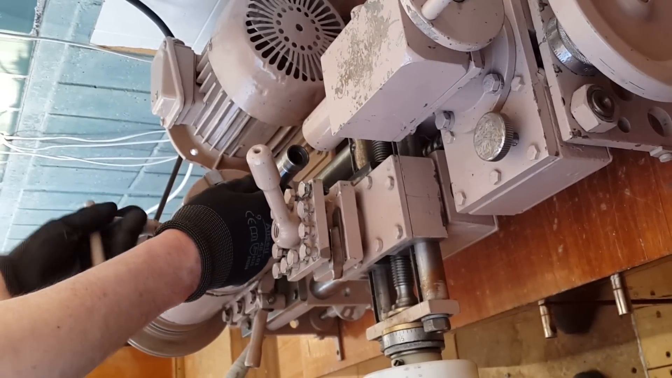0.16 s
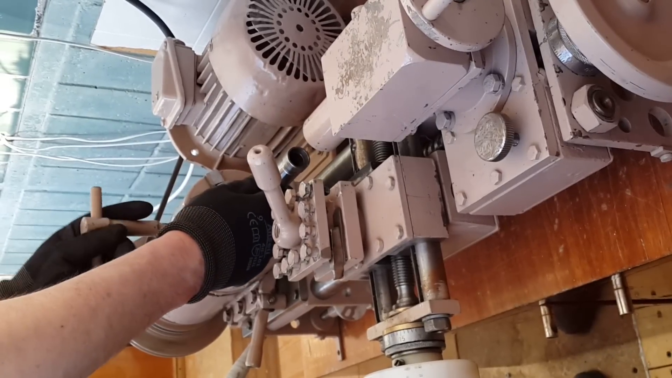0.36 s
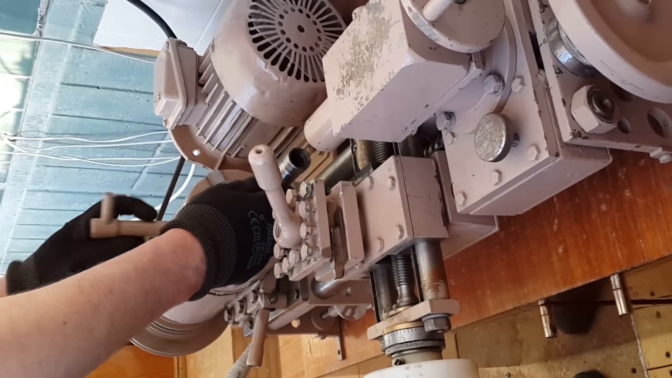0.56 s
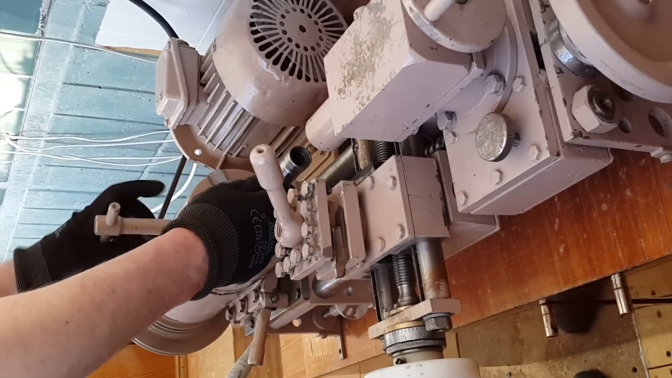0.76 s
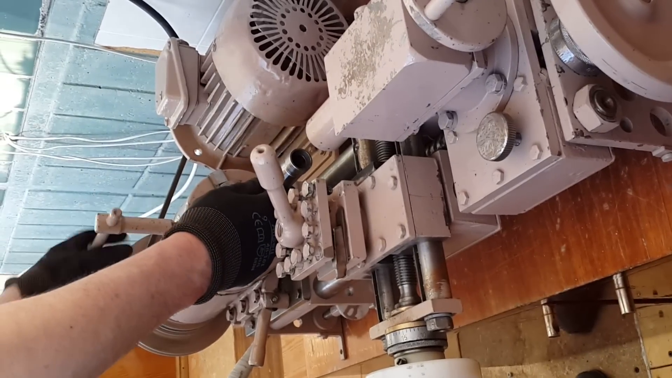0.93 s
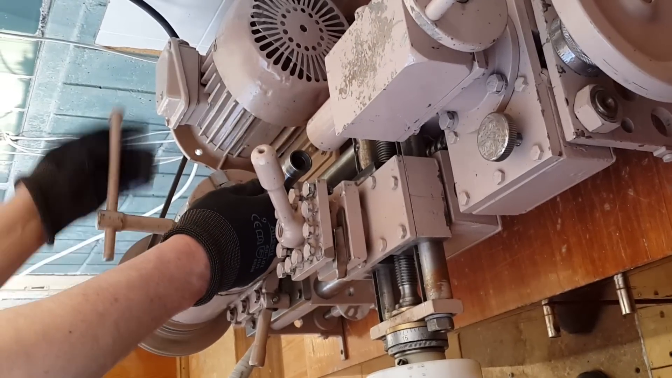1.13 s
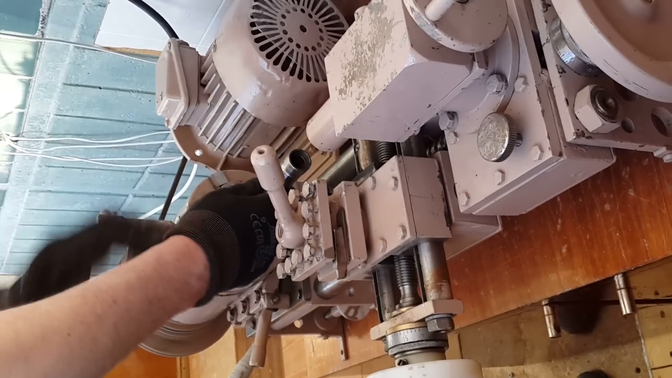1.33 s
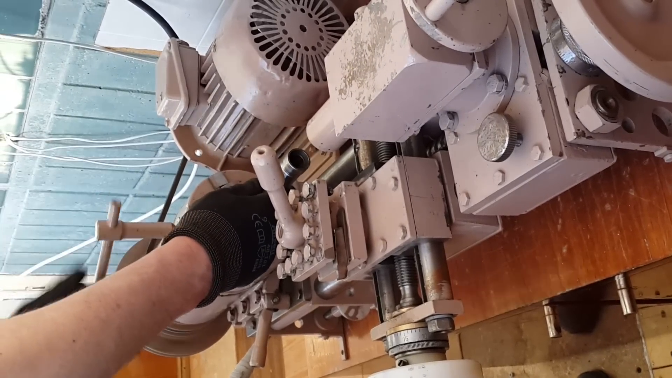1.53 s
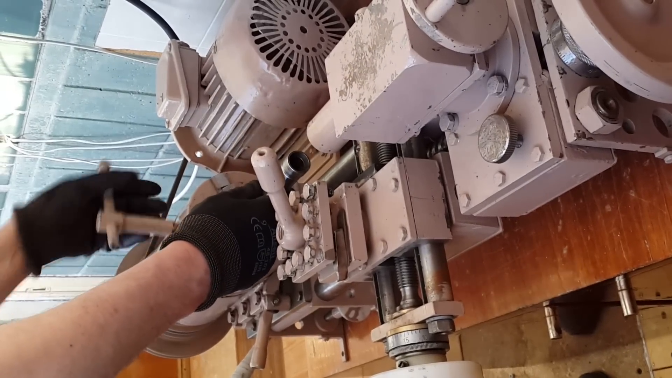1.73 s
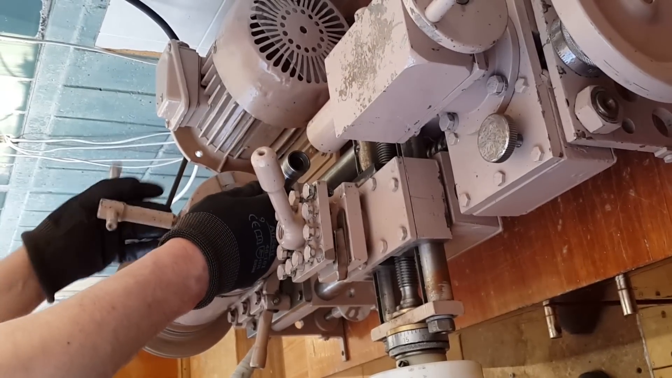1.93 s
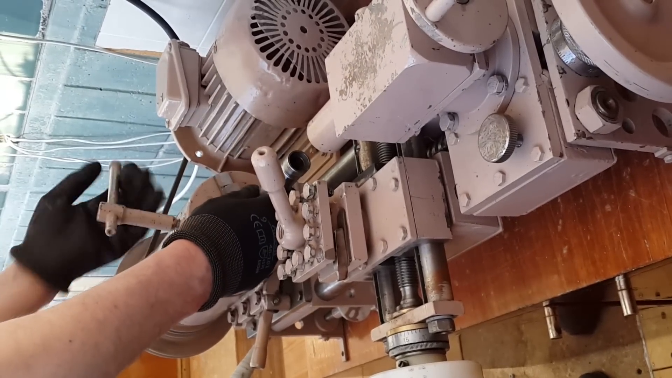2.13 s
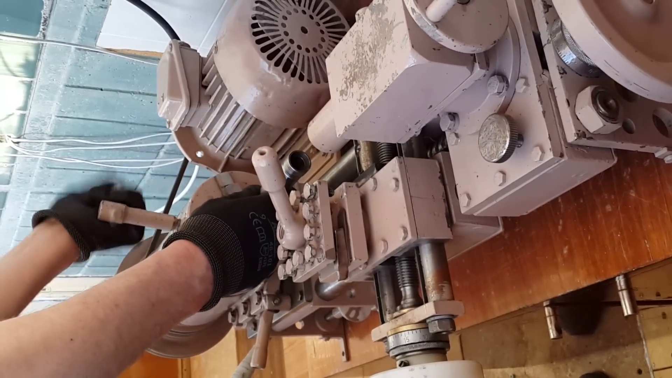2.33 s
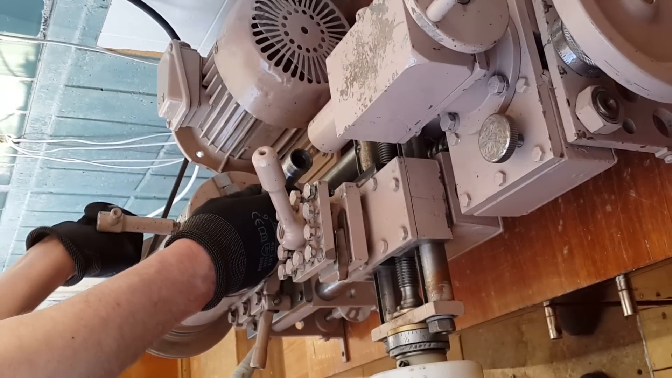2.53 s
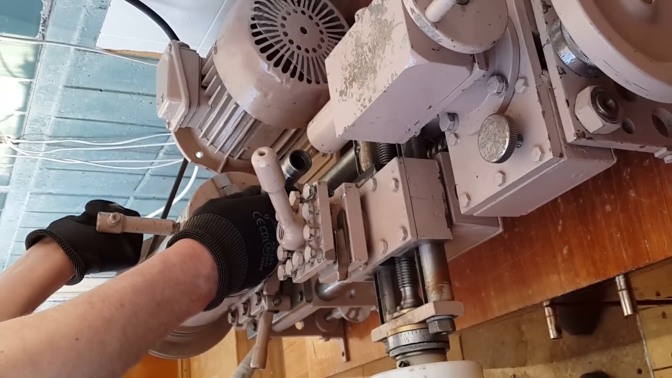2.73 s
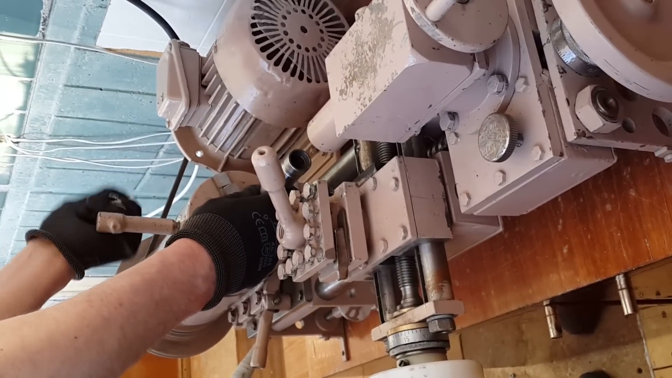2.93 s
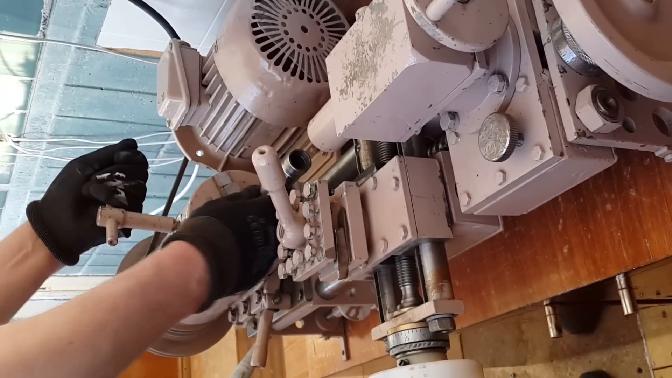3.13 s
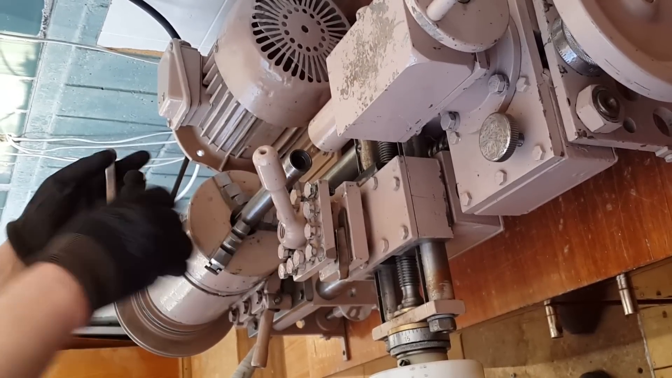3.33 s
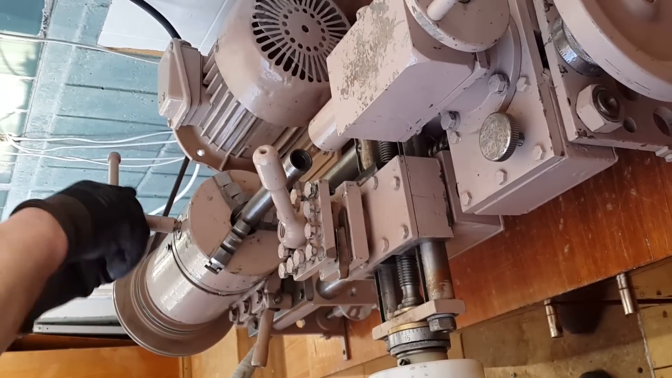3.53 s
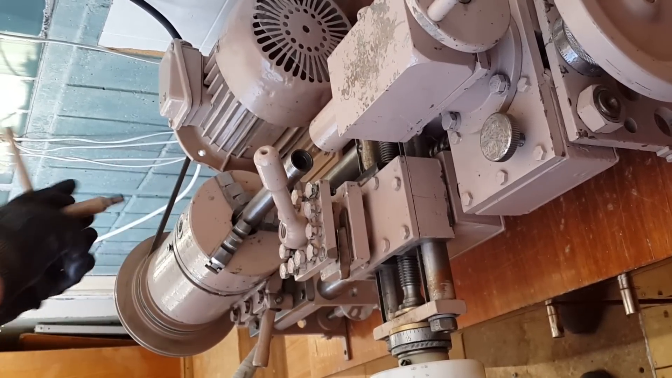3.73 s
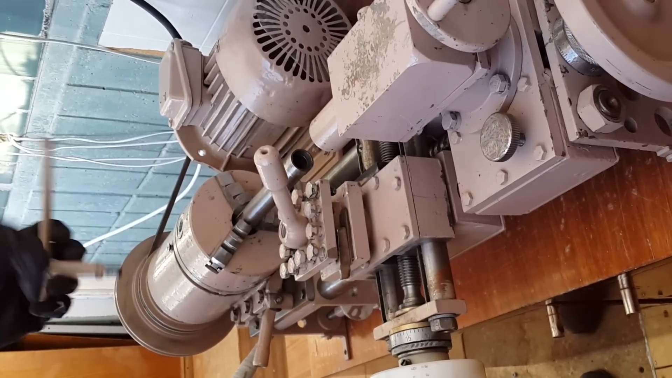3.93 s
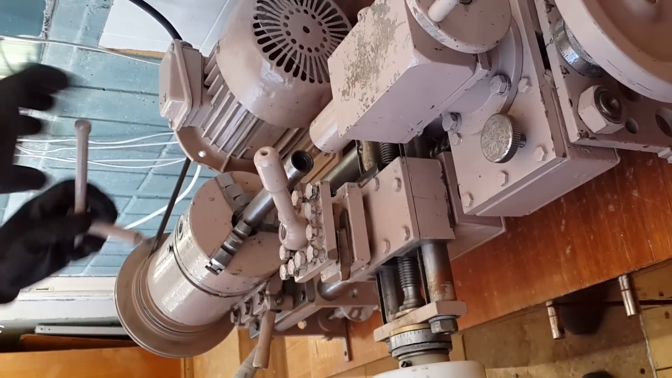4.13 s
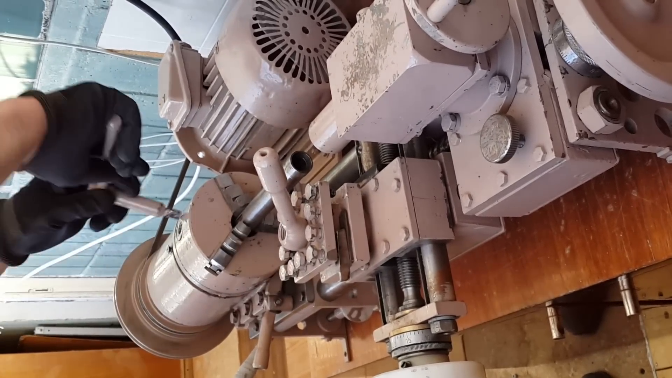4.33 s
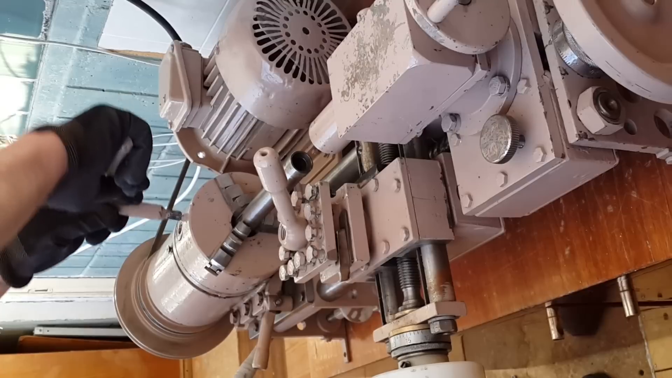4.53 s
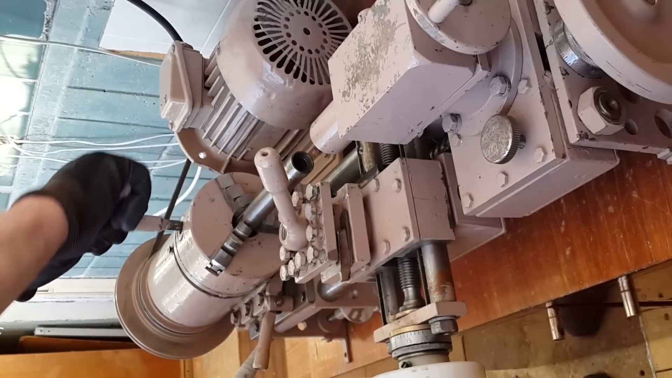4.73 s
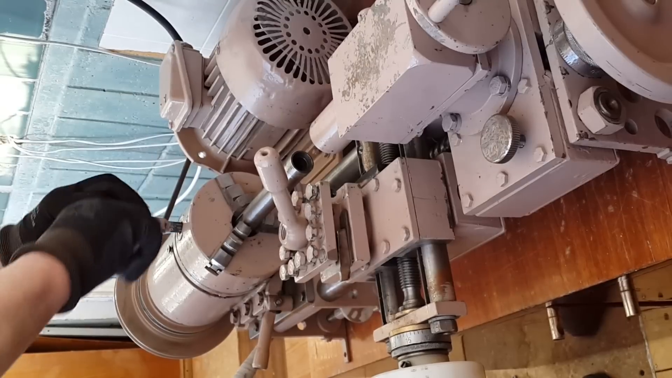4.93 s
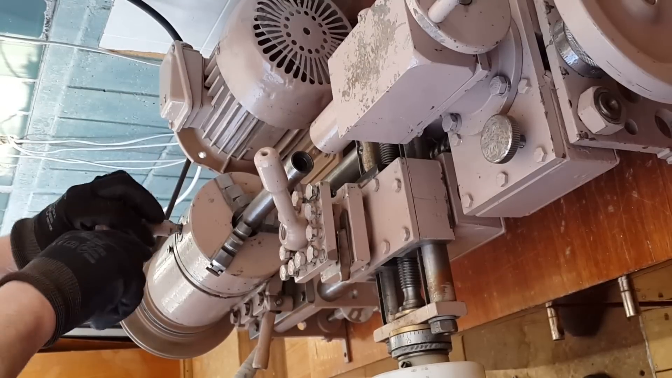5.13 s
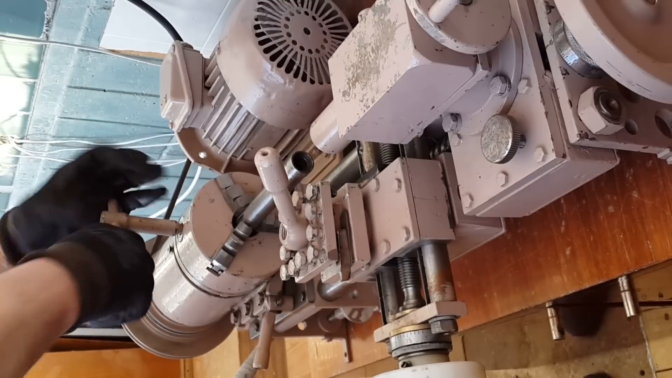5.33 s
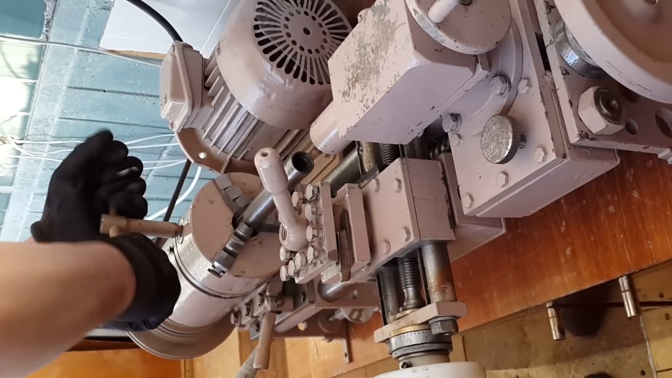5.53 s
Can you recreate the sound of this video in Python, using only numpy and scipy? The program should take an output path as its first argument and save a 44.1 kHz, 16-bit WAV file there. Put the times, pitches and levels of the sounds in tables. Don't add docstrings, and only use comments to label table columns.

```python
import sys
import numpy as np
from scipy import signal
from scipy.fft import rfft, irfft
from scipy.io import wavfile
from scipy.ndimage import uniform_filter1d, minimum_filter1d, map_coordinates

SR = 44100
rng = np.random.default_rng(int(sys.argv[2]) if len(sys.argv) > 2 else 0)


def output_pcm(signal):
    pcm = np.clip(np.atleast_2d(signal).T, -1, 1) * 32767
    wavfile.write(sys.argv[1], SR, np.round(pcm).astype(np.int16))


def natural_amplitude(level_db):
    exponent = np.asarray(level_db, float) / 20
    return 10 ** exponent


N = 250047
TIME = np.arange(N) / SR

# f/Hz, level/dB per Hz
SHOP_AIR = [(20, -16), (60, -22), (200, -12.5), (1000, -17.5), (4000, -20.5), (9000, -18), (13000, -24),
            (15500, -13)]
SHOP_AIR_DB = -1
# t/s, level/dB
RUSTLE = [(.6, -54.5), (.97, -60), (1.9, -50), (2.3, -54), (2.95, -62.5), (3.3, -53), (3.53, -64.5),
          (4.6, -65), (5.67, -48.5)]
# f/Hz, level/dB rms
WHINE = [(200, -72), (315, -72), (9365, -88)]
ROOM_T60_S, ROOM_DB, ROOM_LOW_HZ, ROOM_TOP_HZ = 0.145, -1.5, 640, 13300

# f/Hz, left minus right level/dB
PORTS = [(150, -2), (380, -2.5), (700, 0.5), (1500, -5), (4400, 4), (8120, -1.5), (15000, -5.5)]
# t/s, lag/samples
LEFT_LAG = [(0, 11), (1.7, 5.5), (2.0, -7), (3.3, -4), (3.6, 13), (4.3, 0), (4.45, 21), (5.67, 18.5)]
RUMBLE_DB = -81
DIP_RISE_DB, DIP_S, DIP_HZ = 12.5, 0.045, 11600

# f/Hz, level/dB, t60/s
STAND = [(84.5, -13.5, 0.24), (107.8, -4.5, 0.16), (121, 0.5, 0.054), (149, 1.5, 0.1), (199, -2.5, 0.13),
         (216.6, -6.5, 0.16), (258, 1, 0.054), (312, -3.5, 0.088), (375.5, -2, 0.063), (438.4, -9.5, 0.18),
         (484, -8, 0.1)]
CASTING = [(525, -0.5, 0.092), (626, -10.5, 0.14), (696, -17.5, 0.22), (849.7, -1, 0.063),
           (933, -1.5, 0.041), (995, -5, 0.11), (1062, -1, 0.047), (1281.6, -4.5, 0.039),
           (1520, -19, 0.0091), (1600, -5.5, 0.039), (1788, 1.5, 0.011)]
CHUCK = [(1630, 2, .035), (1750, 2, .035), (2090, -6, .02), (2330, -4, .02), (2580, -3, .025),
         (2910, -2, .025), (3400, -5, .025), (3800, -5, .025), (4200, -2, .03), (4560, -3, .025),
         (5170, -2, .025), (5980, -5, .02), (6930, -3, .03), (8500, -5, .02)]
# f/Hz, level/dB, t60/s
HANDLE = [
    [(4264, -2, .06), (4390, 1, .065)],
    [(1728, -4, .07)],
    [(8170, 2, .06)],
    [(12440, -7, .14), (12700, -2, .14)],
]

# t/s, peak level/dB, strongest f/Hz
THUMPS = [(0.025, -33, 423), (0.114, -31.5, 414), (0.36, -41, 287), (0.403, -35.5, 210),
          (0.479, -36, 257), (0.562, -37, 161), (0.607, -20, 255), (0.628, -22, 188),
          (0.702, -19, 260), (0.73, -26.5, 199), (0.858, -38, 312), (1.004, -45.5, 312),
          (1.349, -25, 240), (1.401, -24.5, 163), (1.543, -29, 280), (1.846, -21, 149),
          (1.885, -42, 163), (2.003, -41, 275), (2.04, -23, 148), (2.057, -30.5, 460),
          (2.072, -31, 187), (2.1, -35, 148), (2.222, -38, 246), (2.268, -44.5, 200),
          (2.385, -20.5, 160), (2.44, -22.5, 138), (2.488, -21.5, 188), (2.644, -29.5, 237),
                (2.68, -32, 160), (3.08, -31.5, 207), (3.109, -21, 144), (3.284, -39, 146),
                (3.544, -41, 230), (3.632, -38.5, 175), (3.68, -33, 152), (3.724, -32.5, 138),
                (4.455, -23.5, 230), (4.489, -38, 177), (4.665, -30.5, 250), (4.718, -32, 211),
                (4.859, -28, 241), (4.883, -26.5, 265), (4.946, -25.5, 126), (4.969, -16, 260),
                (5.004, -33, 151), (5.143, -27, 160), (5.182, -18.5, 158), (5.224, -26, 185),
                (5.361, -27.5, 164), (5.487, -27, 136)]
# t/s, peak level/dB, strongest f/Hz
CHUCK_BLOWS = [(0.0293, -35, 5080), (0.115, -27, 3300), (0.306, -40, 2660), (0.3391, -36, 3440),
               (0.4224, -49, 1630), (0.478, -49, 1640), (0.6019, -25, 5640), (0.7035, -28, 1640),
               (0.768, -34, 1740), (0.8574, -34, 1690), (1.0804, -41, 1740), (1.1174, -34, 1750),
               (1.131, -30, 1590), (1.1554, -30, 1640), (1.173, -19, 1620), (1.264, -27, 1760),
               (1.287, -34, 1720), (1.3574, -20, 5080), (1.3992, -19, 1740), (1.4548, -9.5, 1630),
               (1.5084, -17.5, 2410), (1.5408, -15, 5000), (1.5695, -8.5, 2920), (1.6757, -22.5, 1760),
               (1.7315, -36, 1600), (1.7516, -19, 1610), (1.8064, -18, 1610), (2.0057, -35, 1850),
               (2.0534, -28, 5330), (2.2196, -43, 1940), (2.341, -40, 1820), (2.383, -22, 2220),
               (2.4379, -20, 6340), (2.4794, -19, 4360), (2.5691, -28, 1750), (2.6765, -23, 1860),
               (3.0164, -38, 1600), (3.083, -34, 2390), (3.0997, -31.5, 1670), (3.678, -36, 7160),
               (3.7259, -29.5, 3990), (4.4541, -15, 4370), (4.581, -52, 1730), (4.667, -40, 2640),
               (4.6887, -52, 3770), (4.8594, -28, 3970), (4.8824, -16, 6990), (4.9428, -22, 1740),
               (4.9681, -4.5, 5100), (5.1437, -27, 1630), (5.327, -35, 1820), (5.3705, -28.5, 2140),
               (5.429, -41, 1520), (5.4784, -29, 3360), (5.5965, -34, 1810)]

# peak t/s, rise t/s and fall t/s over 20 dB, level/dB, brightest f/Hz
GLOVES = [(3.17, 0.044, 0.039, -53.5, 2660), (3.248, 0.03, 0.23, -60, 6450),
          (3.39, 0.078, 0.044, -56.5, 3940), (3.674, 0.079, 0.18, -82, 6800), (3.75, 1, 0.14, -64, 4000),
          (3.826, 0.16, 0.068, -52.5, 4400), (4.034, 0.16, 0.012, -42, 6030),
          (4.07, 0.035, 0.11, -59, 7100), (4.31, 0.0062, 0.11, -61.5, 5840),
          (5.477, 0.027, 0.13, -55, 3440), (5.528, 0.06, 0.027, -30, 3520), (5.66, 0.52, 0.65, -52.5, 3840)]
# t/s, peak level/dB, then level/dB of single, third and top order rel to the low
TINKLES = [(0.1716, -50, -1.5, -7, 6), (0.611, -63, 2, -13, -24), (2.465, -45, 3, -9, -16),
           (2.545, -56, 5, -1, -14), (2.5819, -66, 9, -18, -29), (2.638, -58, 5, -4, -24),
           (2.6707, -61, 10, -17, -28), (2.695, -72, 15, -11, -31), (2.763, -67, 10, -9, -8),
           (2.835, -65, -13, 4, -20), (3.337, -62, -18, -8, -43), (4.711, -74, -4, 8, -25)]
# peak t/s, rise t/s and fall t/s over 20 dB, level/dB
RATTLE = [(2.5, .04, .05, -84), (2.585, .04, .035, -79), (2.692, .045, .035, -76), (2.78, .06, .06, -92),
          (2.835, .04, .02, -81)]
# start t/s, end t/s
BITE = (2.49, 2.86)
GRIP_DB = 0.5
# start t/s, end t/s, f/Hz, level/dB
GROAN = (5.495, 5.61, 458, -49)
# start t/s, end t/s, from f/Hz, to f/Hz, level/dB
SQUEAKS = [(2.065, 2.125, 5250, 4900, -66), (2.135, 2.19, 4250, 3950, -62), (5.44, 5.49, 1480, 1640, -51),
           (5.45, 5.482, 2950, 3250, -60), (5.452, 5.482, 4500, 5000, -53), (5.49, 5.575, 2700, 2350, -48),
           (5.51, 5.58, 3300, 2900, -52), (5.5, 5.56, 2200, 2000, -52), (5.5, 5.56, 4200, 3700, -50),
           (5.5, 5.57, 1600, 1550, -54), (5.6, 5.7, 1800, 1700, -59)]

# peak t/s, rise t/s and fall t/s over 20 dB, effort level/dB, slip level/dB
TURNS = [(0.0, .1, 0.71, -54.5, -7), (0.135, 0.38, 0.061, -50, -8), (0.415, 0.16, 0.096, -43.5, -7.5),
         (0.633, 0.045, 0.044, -33, 1), (0.742, 0.19, 0.14, -48, 8.5), (1.94, 0.22, 0.41, -71.5, 25.5),
         (2.02, 0.037, 0.19, -45.5, -44), (2.387, 0.039, 0.33, -36, -13), (2.53, 0.17, 0.081, -56, -11),
         (2.682, 0.06, 0.027, -39.5, -14), (2.81, 0.34, 0.13, -46, -17), (3.23, 0.52, 0.072, -57, -4),
         (3.61, 0.34, 0.16, -57.5, -28), (3.91, 0.59, 0.4, -55.5, 5.5), (4.653, 0.015, 0.32, -49.5, -8.5),
         (4.87, 0.046, 0.19, -41, -16), (5.045, 0.14, 0.3, -59, 15.5), (5.16, 0.083, 0.13, -54.5, 11),
         (5.4, 0.092, 0.48, -50, -2)]
# t/s, effort level/dB, slip level/dB
SPIN = [(1.05, -63, 9), (1.076, -50.5, -4.5), (1.172, -42.5, 14.5), (1.41, -38.5, 12), (1.558, -34, 11),
        (1.62, -40.5, 9.5), (1.73, -42.5, -0.5), (1.812, -35.5, 7), (1.87, -70, 14)]
CASTING_DRAG_DB, CASTING_SLIP_SHARE, TEETH_DRAG_DB, TEETH_SLIP_SHARE = -8, 0.27, -11.5, 0.85

# t/s, peak level/dB, casting level/dB rel, top level/dB rel
KEY_IN_SOCKET = [(0.0288, -37.5, -6, -6), (0.401, -55, 13.5, -11), (0.421, -42.5, -4, -28),
                 (1.009, -53, -18, -12), (2.005, -44, -10, -7), (2.2203, -57, 4, -16),
                 (2.6394, -45.5, -5, -19), (2.7897, -41.5, -6.5, -29), (3.0989, -30, -10, -62),
                 (3.5438, -72.5, 18.5, -31), (3.6307, -87, 28, 5), (3.678, -43, -3, 6),
                 (3.7257, -37, -6, -7), (4.4528, -27, -8, -11), (4.5836, -51, -10, -6),
                 (4.6665, -48.5, 2.5, -32), (4.6887, -33.5, -11.5, -10.5), (4.8403, -49.5, 7, -5),
                 (4.8594, -28.5, -4, -6), (4.8815, -22, -11, -8), (4.9654, -15.5, -5, -1.5),
                 (5.1438, -26.5, -10, -7.5), (5.1817, -40, 8, -8), (5.3706, -42, 12, -4),
                 (5.4775, -26, -24, -8)]
# t/s, peak level/dB, casting level/dB rel, top level/dB rel
BAR_ON_JAWS = [(0.1146, -27.5, -13.5, -49), (0.305, -46.5, -5.5, -10), (0.4765, -52.5, 5, -31),
               (0.7008, -25.5, -0.5, -8), (1.4557, -24, -8, -6.5), (2.4799, -28, -12.5, -24)]
# t/s, peak level/dB, casting level/dB rel, top level/dB rel
PINION_STOPS = [(2.0532, -36, -9, -17), (2.3408, -44.5, -6, -13), (2.4378, -18, -13, -5.5),
                (4.9438, -31.5, 3, -9)]
# t/s, peak level/dB, casting level/dB rel, top level/dB rel
SCROLL_SLACK = [(0.594, -37.5, -9, -3), (0.6035, -21.5, -12.5, -2.5), (0.7694, -46, -5, -23),
                (0.857, -47.5, -2.5, -1), (1.0795, -39, -8.5, -29), (1.3576, -28.5, -9, -1.5),
                (1.4002, -25, -7, -8), (1.5745, -25.5, -34, -0.5), (1.7325, -28, -12, -27),
                (1.8145, -33, 1.5, -4.5), (2.381, -24.5, -37, -2.5), (2.5696, -26, -40, -31),
                (2.6748, -35, -7, -29), (3.0172, -39, -6, -42), (3.0834, -31.5, -8.5, -69),
                (5.596, -37, -13, -1.5)]
SOCKET_HZ, JAWS_HZ, PINION_HZ, SCROLL_HZ = 850, 1040, 1290, 1840
CONTACT_MS, CONTACT_MS_PER_DB = 2.67, 1.7
# f/Hz, level/dB per Hz
CRACK = [(300, -2), (800, 1), (2000, 7.5), (4400, 5), (7000, -1), (9000, -5.5), (12000, -3.5), (15000, 4)]
# f/Hz, level/dB per Hz
RUB = [(300, -0.5), (700, -16), (1700, 0), (3000, 0.5), (6000, -10), (9250, -7), (13000, -19), (15000, -57)]


def rms_one(x):
    return x / np.sqrt(np.mean(x ** 2) + 1e-20)


def in_time(rows):
    s, *columns = np.transpose(rows)
    return [np.interp(TIME, s, column) for column in columns]


def inside(rows):
    return np.clip(np.minimum(TIME - rows[0][0] + 0.02, rows[-1][0] + 0.02 - TIME) / 0.02, 0, 1)


def progress(start, end):
    return np.clip((TIME - start) / (end - start), 0, 1)


def butter(x, order, hz, kind="low"):
    return signal.sosfilt(signal.butter(order, hz, kind, fs=SR, output="sos"), x)


def log_curve(hz, points):
    point_hz, db = np.transpose(points)
    return np.interp(np.log(hz), np.log(point_hz), db)


def colour(x, points):
    hz = np.maximum(np.linspace(0, SR / 2, 1025), 1)
    cepstrum = irfft(np.log(natural_amplitude(log_curve(hz, points))))
    cepstrum[1:1024] *= 2
    cepstrum[1025:] = 0
    taps = irfft(np.exp(rfft(cepstrum)))
    return signal.oaconvolve(x, taps / np.sqrt(np.sum(taps ** 2)))[:N]


def wobble(rate, spread_db):
    r = np.exp(-80 * np.pi * rate / SR)
    slow = signal.lfilter([1], [1, -2 * r, r * r], rng.standard_normal(N // 40 + 2002))[2000:]
    return np.interp(np.arange(N) / 40, np.arange(len(slow)), natural_amplitude(spread_db * rms_one(slow)))


def swells(s, rise_s, fall_s, db):
    late = TIME[::32] - s[:, None]
    rise = -late / np.maximum(rise_s, 0.005)[:, None]
    fall = late / np.maximum(fall_s, 0.005)[:, None]
    loss_db = 20 * np.where(late < 0, rise, fall)
    return np.interp(TIME, TIME[::32], natural_amplitude(db[:, None] - loss_db).sum(axis=0))


def grit(per_s, uneven_db):
    sizes = natural_amplitude(uneven_db * np.minimum(rng.exponential(1, N), 5)) * rng.choice([-1, 1], N)
    return rms_one(sizes * (rng.random(N) < per_s / SR) * wobble(40, 1.5))


def tap(count, width_ms, tail_db, tail_ms):
    ms = np.arange(4096) * 1000 / SR
    push = np.sin(np.pi * np.clip(ms / width_ms, 0, 1)) ** 2
    shudder = rng.standard_normal((count, 4096)) * np.exp(-ms / tail_ms)
    return push / push.sum() + natural_amplitude(tail_db) * shudder / np.sqrt(np.sum(shudder ** 2, axis=1, keepdims=True))


def chatter(lengths_ms, tail_db, tail_ms):
    ms = np.arange(4096) * 1000 / SR
    shape = np.exp(-ms / np.maximum(lengths_ms, 0.3)[:, None]) + natural_amplitude(tail_db) * np.exp(-ms / tail_ms)
    rough = rng.standard_normal(shape.shape) * natural_amplitude(5 * rng.standard_normal(shape.shape))
    bursts = rough * shape * np.minimum(ms / 0.9, 1)
    return bursts / np.sqrt(np.sum(bursts ** 2, axis=1, keepdims=True))


def contacts(times, gains, bursts):
    at = np.round(times * SR).astype(int)[:, None] + np.arange(bursts.shape[1])
    return np.bincount(at.ravel(), (bursts * gains[:, None]).ravel(), N + 4096)[:N]


def ring(force, hz, t60):
    r, w = natural_amplitude(-60 / (t60 * SR)), 2 * np.pi * hz / SR
    return signal.lfilter([0, np.sin(w)], [1, -2 * r * np.cos(w), r * r], force + 1e-18)


def body(modes, blows, bursts, spread_db, friction, focus_db):
    times, blow_db, blow_hz = blows
    luck_db = rng.normal(0, 1, (len(times), len(modes))) * spread_db
    energy = sum(natural_amplitude(2 * db) * t60 * SR / (4 * np.log(1000)) for hz, db, t60 in modes)
    out = 0
    for k, (hz, db, t60) in enumerate(modes):
        reach_db = blow_db + luck_db[:, k] - focus_db * np.abs(np.log2(hz / blow_hz))
        force = contacts(times, natural_amplitude(reach_db), bursts)
        force = force + friction * wobble(21.5, 1.45) / np.sqrt(energy)
        out = out + ring(force * natural_amplitude(db), hz, t60) * (-1) ** k
    return out


def drag(slip_share):
    s, rise_s, fall_s, effort_db, slip_db = np.transpose(TURNS)
    spin_db, spin_slip_db = in_time(SPIN)
    short_turns = swells(s, rise_s, fall_s, effort_db + slip_share * slip_db)
    return short_turns + natural_amplitude(spin_db + slip_share * spin_slip_db) * inside(SPIN)


def shop_air():
    hiss = np.array([colour(rng.standard_normal(N), SHOP_AIR) for _ in range(2)])
    out = hiss * natural_amplitude(SHOP_AIR_DB + in_time(RUSTLE)[0]) * wobble(6, 1.5)
    for hz, db in WHINE:
        unsteady_phase = 0.323 * wobble(4.46, 11)
        out = out + natural_amplitude(db - 4.5) * wobble(31, 1.1) * np.sin(2 * np.pi * hz * TIME + unsteady_phase)
    return out


def room(x):
    t = np.arange(SR // 2) / SR
    dying = natural_amplitude(-60 * t / ROOM_T60_S) * np.clip(t / 0.0005 - 0.5, 0, 1)
    tail = rfft(rng.standard_normal((2, len(t))) * dying)
    even = tail / np.sqrt(uniform_filter1d(np.abs(tail) ** 2, size=30, axis=1))
    tail = irfft(even, len(t)) * (t < 2 * ROOM_T60_S)
    tail = butter(tail, 2, [ROOM_LOW_HZ, ROOM_TOP_HZ], "band")
    tail = tail / np.sqrt(np.sum(tail ** 2) / 2)
    return natural_amplitude(ROOM_DB) * signal.oaconvolve(x[None], tail, axes=1)[:, :N]


def gloves():
    s, rise_s, fall_s, db, top_hz = np.transpose(GLOVES)
    fizz = [grit(15000, uneven_db=6.5) * swells(s, rise_s, fall_s, db) for _ in range(2)]
    top_octave = np.log2(np.interp(TIME, s, top_hz))
    out = 0
    for k, hz in enumerate(np.geomspace(1100, 12500, 9)):
        band = butter(fizz[k % 2] + 1e-18, 2, [hz / 1.8, hz * 0.99], "band")
        hump_db = np.maximum(-2.5 * (np.log2(hz) - top_octave) ** 2, -10)
        out = out + band * natural_amplitude(hump_db + 3 - 9 * (hz > 10000)) * wobble(15, 1.5)
    return out


def handle():
    s, peak_db, *rel_db = np.transpose(TINKLES)
    slips = tap(len(s), width_ms=0.024, tail_db=-5.5, tail_ms=12)
    buzz = swells(*np.transpose(RATTLE)) * butter(grit(900, uneven_db=3.5), 6, 9500)
    way = progress(*BITE)
    grip_db = GRIP_DB * np.where(way > 0, 1 - 2 * way, -1)
    out = 0
    for order, (share_db, modes) in enumerate(zip([0] + rel_db, HANDLE)):
        force = contacts(s, natural_amplitude(peak_db + share_db + 5), slips) + buzz
        for k, (hz, db, t60) in enumerate(modes):
            twin_db = [-grip_db, grip_db][k] if order == 0 else 0
            out = out + ring(force * natural_amplitude(db + twin_db), hz, t60)
    return out


def last_pull():
    start, end, hz, db = GROAN
    arch = np.sqrt(np.abs(np.sin(np.pi * progress(start, end))))
    out = natural_amplitude(db) * arch * np.sin(2 * np.pi * hz * TIME) * wobble(23, 2.9)
    for start, end, from_hz, to_hz, db in SQUEAKS:
        way = progress(start, end)
        phase = 2 * np.pi * np.cumsum(from_hz + (to_hz - from_hz) * way) / SR
        out = out + natural_amplitude(db) * np.sin(np.pi * way) * np.sin(phase) * wobble(160, 5)
    return out


def stand():
    s, peak_db, hz = np.transpose(THUMPS)
    slow = tap(len(s), width_ms=1.8, tail_db=0, tail_ms=40.5)
    friction = drag(0) * grit(900, uneven_db=4) * natural_amplitude(-0.5)
    return body(STAND, (s, peak_db - 5.5, hz), slow, 1.93, friction, focus_db=9.5)


def knocks():
    parts = [(KEY_IN_SOCKET, SOCKET_HZ), (BAR_ON_JAWS, JAWS_HZ),
             (PINION_STOPS, PINION_HZ), (SCROLL_SLACK, SCROLL_HZ)]
    rows = [tuple(row) + (hz,) for part, hz in parts for row in part]
    s, peak_db, casting_db, top_db, hz = np.transpose(rows)
    return s, peak_db, casting_db, hz, top_db, CONTACT_MS + CONTACT_MS_PER_DB * (peak_db + 25)


def lathe():
    s, peak_db, casting_db, casting_hz, top_db, contact_ms = knocks()
    teeth = grit(5000, uneven_db=4) * drag(TEETH_SLIP_SHARE) * natural_amplitude(TEETH_DRAG_DB)

    sharp = chatter(contact_ms, tail_db=-19, tail_ms=24)
    bands = [(6000, "low", 19), ([6000, 10000], "band", top_db + 31), (10000, "high", 2 * top_db + 12)]
    crack = sum(butter(contacts(s, natural_amplitude(peak_db + db), sharp), 3, hz, kind) for hz, kind, db in bands)
    direct = colour(crack, CRACK) + natural_amplitude(1.5) * colour(teeth, RUB)

    at, ring_db, ring_hz = np.transpose(CHUCK_BLOWS)
    short = chatter(np.full(len(at), 3), tail_db=-22, tail_ms=18)
    chuck = body(CHUCK, (at, ring_db - 14, ring_hz), short, 2, teeth * natural_amplitude(-11), focus_db=13)

    blunt = tap(len(s), width_ms=0.21, tail_db=-3, tail_ms=7.9)
    friction = drag(CASTING_SLIP_SHARE) * natural_amplitude(CASTING_DRAG_DB - 0.5) * grit(2500, uneven_db=-2.5)
    blows = s, peak_db + casting_db + 2, casting_hz
    casting = body(CASTING, blows, blunt, 0.33, friction, focus_db=11.5)
    return direct + chuck + casting


def scene():
    near = lathe() + stand() + handle() + gloves() + last_pull()
    lag, at = in_time(LEFT_LAG)[0], np.arange(N)
    direct = np.array([map_coordinates(near, [at - lag * side / 2], order=3) for side in (1, -1)])
    return direct + room(near) + shop_air()


def dip_top(x):
    level_db = 10 * np.log10(uniform_filter1d(np.mean(x ** 2, axis=0), size=441) + 1e-12)
    jump = (level_db - np.roll(level_db, 1100) > DIP_RISE_DB) * 1.0
    hold = int(DIP_S * SR)
    held = np.roll(-minimum_filter1d(-jump, size=hold), hold // 2 + 500)
    mute = uniform_filter1d(held * (1 - np.roll(jump, -400)), size=300)
    top = signal.sosfiltfilt(signal.butter(8, DIP_HZ, "high", fs=SR, output="sos"), x)
    return x - mute * top


def top_cut(x):
    return signal.sosfilt(signal.butter(12, 15980, fs=SR, output="sos"), x)


def record(dry):
    size = N + 4096 - N % 4096 + 4096
    hz = np.maximum(np.fft.rfftfreq(size, 1 / SR), 1)
    tilt_db = log_curve(hz, PORTS) / 2
    ports = irfft(rfft(dry, 2 * len(hz) - 2) * natural_amplitude([tilt_db, -tilt_db]))[:, :N]
    cut = butter(ports, 4, 72, "high")
    cut = signal.sosfilt(signal.cheby2(10, 35, 15000, fs=SR, output="sos"), cut)
    rumble = natural_amplitude(RUMBLE_DB) * rms_one(butter(rng.standard_normal((2, N)), 1, 40))
    offset = -0.0004
    return top_cut(dip_top(cut) + rumble + offset)


dry = scene()
out = record(dry)
output_pcm(out)
```